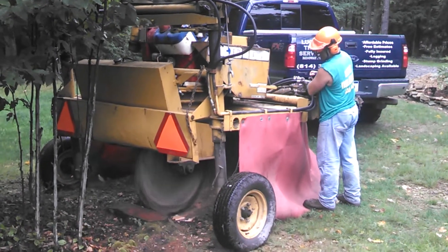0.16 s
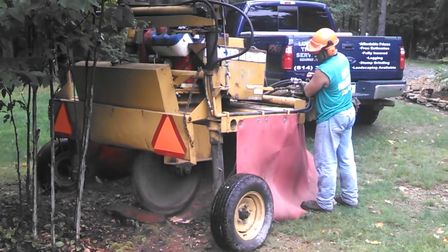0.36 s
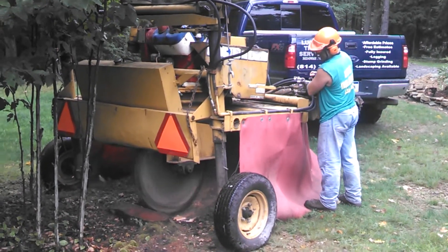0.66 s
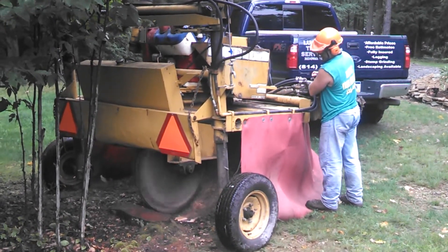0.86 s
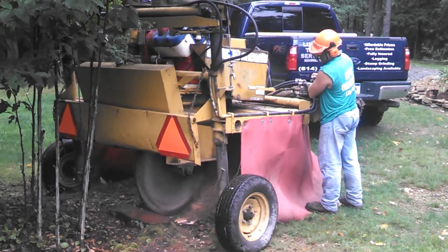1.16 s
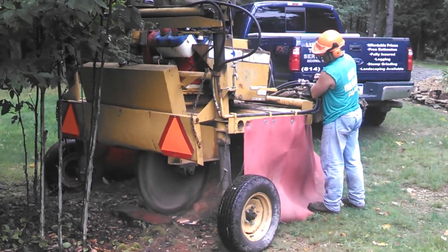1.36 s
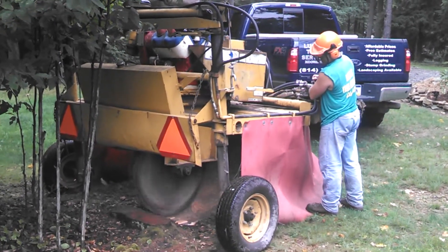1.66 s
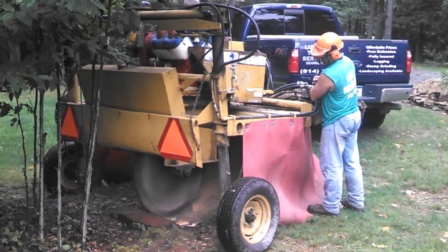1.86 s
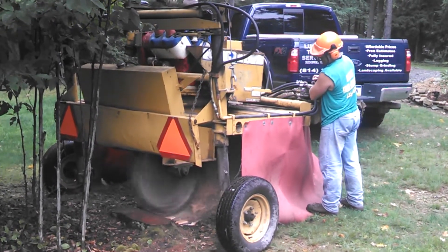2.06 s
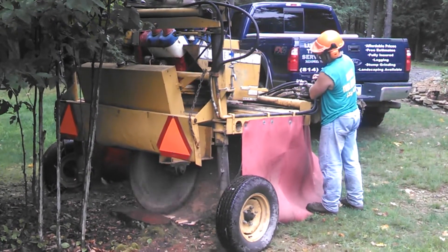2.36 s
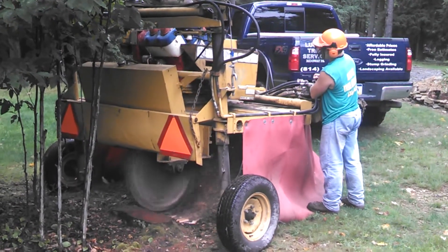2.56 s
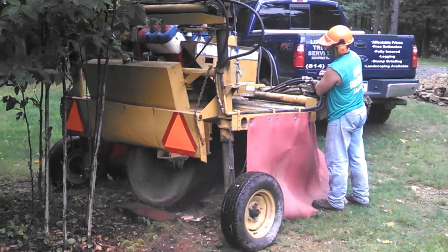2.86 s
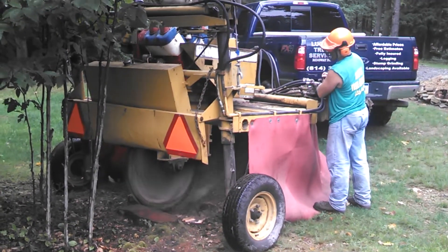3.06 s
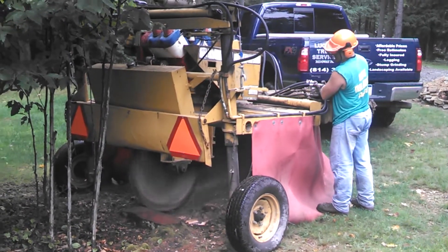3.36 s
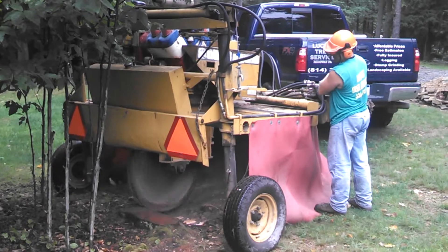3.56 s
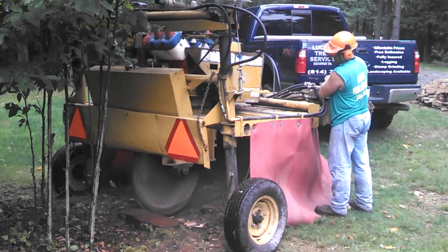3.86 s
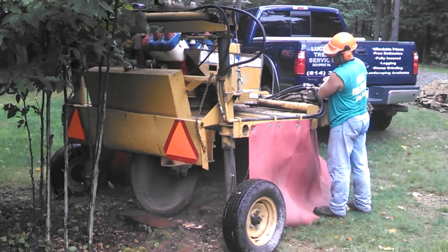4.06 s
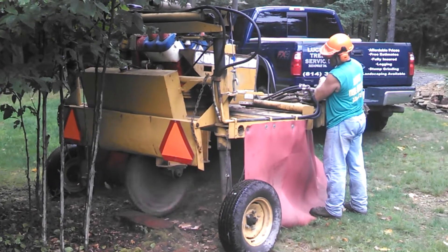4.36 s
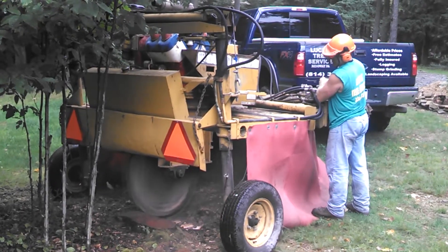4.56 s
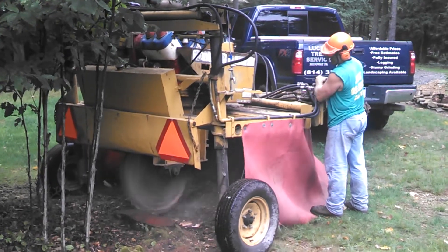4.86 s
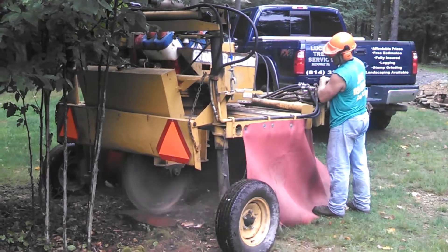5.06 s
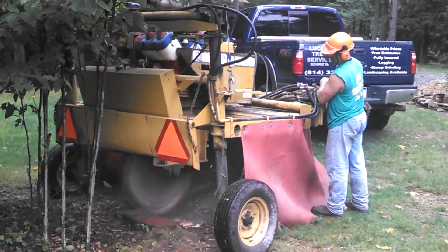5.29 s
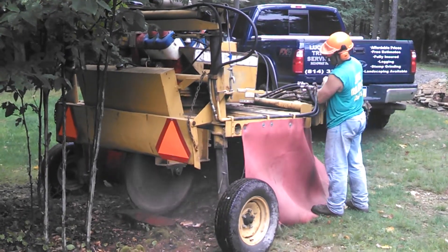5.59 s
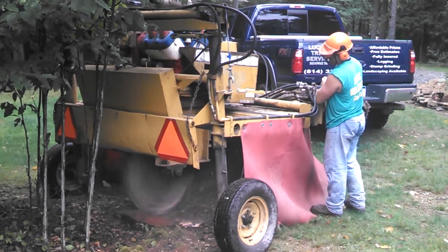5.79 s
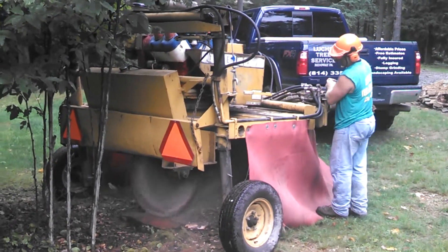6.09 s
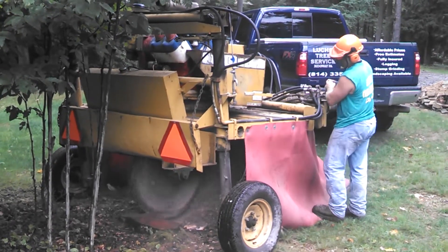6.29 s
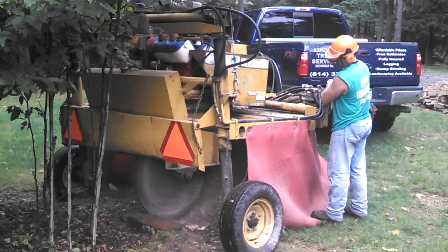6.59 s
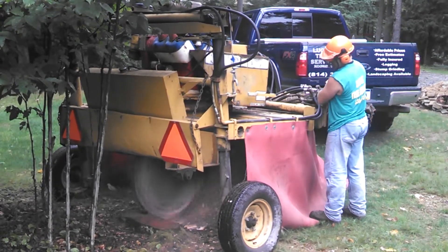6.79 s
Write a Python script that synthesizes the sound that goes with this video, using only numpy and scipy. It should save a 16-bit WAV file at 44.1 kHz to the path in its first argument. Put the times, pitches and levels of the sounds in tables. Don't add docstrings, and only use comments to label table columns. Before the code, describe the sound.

A petrol engine hums and rumbles a few metres away outdoors while a big cutter wheel chews a stump with rough, pulsing thuds and hissing chips. The steel disc rings throughout. The engine sags, then a cluster of hard clangs and a sharp stone crack come around three seconds; it recovers, then bogs down again. Wide stereo, with brief level dips after the loudest cracks.

```python
import sys
import numpy as np
from scipy import signal
from scipy.fft import rfft, irfft
from scipy.io import wavfile
from scipy.ndimage import uniform_filter1d

SR = 44100
rng = np.random.default_rng(int(sys.argv[2]) if len(sys.argv) > 2 else 0)


def voltage_ratio(decibels):
    exponent = np.asarray(decibels, float) / 20
    return 10 ** exponent


def materialize(psi):
    bounded = np.clip(np.atleast_2d(psi).T, -1, 1)
    quanta = np.round(bounded * 32767).astype(np.int16)
    wavfile.write(sys.argv[1], SR, quanta)


N = 305602
TIME_S = np.arange(N) / SR
FREE_HZ, STALLING_HZ = 98, 85.5
SWING_S = 4.4


def read(points, hz, column=1):
    table = np.array(points, float)
    return np.interp(np.log(hz + 1), np.log(table[:, 0] + 1), table[:, column])


def curves(rows):
    s, *columns = np.transpose(rows)
    return [np.interp(TIME_S, s, c) for c in columns]


def bumps(rows):
    return sum(db * np.exp(-((TIME_S - s) / width) ** 2) for s, width, db in rows)


def evened(x):
    return x / np.sqrt(np.mean(x ** 2) + 1e-20)


def coloured(x, points):
    gain = voltage_ratio(read(points, np.fft.rfftfreq(N, 1 / SR)))
    return evened(irfft(rfft(x) * gain, N))


def drift(per_s, channels=1):
    width = max(round(SR / per_s), 2)
    noise = rng.standard_normal((channels, N))
    return evened(uniform_filter1d(uniform_filter1d(noise, width), width))


def ringing(x, modes, wander_db=3.5):
    swells = voltage_ratio(wander_db * drift(6.7, channels=len(modes)))
    total = 0
    for swell, (hz, width_hz, db) in zip(swells, modes):
        radius, angle = np.exp(-np.pi * width_hz / SR), 2 * np.pi * hz / SR
        poles = [1, -2 * radius * np.cos(angle), radius * radius]
        mode = np.sqrt(1 - radius) * signal.lfilter([1, 0, -1], poles, x)
        total = total + voltage_ratio(db) * swell * mode
    return evened(total)


def knocks(per_s, spread_db):
    chance, sign, size = rng.random((3, 2, N))
    height = voltage_ratio(-spread_db * np.log(np.maximum(size, .01)))
    return (chance < per_s / SR) * np.sign(sign - .5) * height


def firing_hz():
    # start_s, firings_hz
    speed = [(0.0, 95.0), (0.42, 95.0), (0.84, 94.2), (1.26, 93.2), (1.68, 91.5), (1.89, 90.4),
             (2.42, 89.7), (2.73, 91.2), (2.94, 93.3), (3.36, 94.4), (3.78, 97.1), (4.2, 97.8),
             (4.62, 97.2), (5.04, 93.4), (5.46, 91.4), (5.88, 88.3), (6.3, 84.7), (6.93, 85.6)]
    return curves(speed)[0]


def wheel_turns(hz):
    firings_per_turn, heavy_tooth_s, swing_turns = 9.55, 6.098, .13
    cycles = np.cumsum(hz) / SR
    since_heavy = cycles - cycles[round(heavy_tooth_s * SR)]
    return since_heavy / firings_per_turn + swing_turns * (np.arange(N) < SWING_S * SR)


def tooth_bite(teeth):
    # pitch_hz, level_db
    wood = [(350, -20.5), (600, -5.5), (800, -3), (1000, -6), (1500, -6), (1950, -6.5), (2200, -3.5),
            (2700, -9), (3600, -12), (4300, -25)]
    # pitch_hz, width_hz, level_db
    disc = [(1027, 11, 2), (1228, 46, 3.5), (1527, 31, -4), (1600, 5.3, 0), (1854, 41, 5), (1975, 69, -3.5),
            (2475, 200, 8), (3130, 390, -15)]
    return 1.137 * coloured(teeth, wood) + 0.34 * ringing(teeth, disc)


def disc_hum(strikes, load):
    # pitch_hz, width_hz, level_db
    free_modes = [(708.5, 26, 2.5), (767, 27, 6.5), (790, 69, -0.5)]
    # pitch_hz, width_hz, level_db
    loaded_modes = [(805, 28, -.5), (845, 30, -3), (878, 28, -1.5), (925, 35, -6)]
    free = np.sqrt(1 - .85 * load ** 2) * ringing(strikes, free_modes, wander_db=1.5)
    return free + 1.3 * load ** 1.5 * ringing(strikes, loaded_modes, wander_db=.8)


def chip_spray(heavy, groups, coarseness_db):
    # pitch_hz, level_db
    chip_colour = [(1500, -3), (3000, 4.5), (4200, 6.5), (6000, 3.3), (9500, 6), (11000, -17), (13000, 0),
                   (14600, -2), (15500, 0)]
    # pitch_hz, level_db
    dust_colour = [(9000, -15), (11000, -6), (13000, -6), (15500, -0.5)]
    fling = np.where(np.arange(N) < SWING_S * SR, .9, 1.6)
    chips = rng.standard_normal((2, N)) + 0.35 * evened(knocks(920, 2.3))
    unsteady = voltage_ratio(0.76 * drift(24) + 1.2 * drift(7.4))
    spray = coloured(chips * unsteady * (1 + fling * heavy + 0.5 * groups), chip_colour)
    dust = coloured(rng.standard_normal((2, N)) * (1 + fling * heavy), dust_colour)
    dust = dust * voltage_ratio(0.93 * drift(2.6))
    dust_loss = 3.2
    return spray + dust * voltage_ratio(-9.0 - dust_loss * (coarseness_db - 6.0))


def cutter(hz, load, spray_db, bite_db, hum_db):
    turns = wheel_turns(hz)
    heavy = np.sqrt(load) * uniform_filter1d(np.exp(-(turns % 1) / .12), size=150)
    groups = load * uniform_filter1d(np.exp(-((4 * turns + .25) % 1) / .35), size=200)
    after = load * np.cos(2 * np.pi * (turns - .45))
    uneven = voltage_ratio(0.96 * drift(33))
    teeth = knocks(3000, 1.27) * uneven * (1 + .5 * heavy + 0.16 * groups)
    strikes = knocks(2400, 1.9) * (1 + 0.22 * after) * (1 + 1.8 * groups)
    bite = voltage_ratio(bite_db - 1.5) * tooth_bite(teeth)
    hum = voltage_ratio(hum_db - 4.5) * disc_hum(strikes, load)
    return bite + hum + voltage_ratio(spray_db + 2.0) * chip_spray(heavy, groups, bite_db - spray_db)


def hits(rows, t60, lift_db, rise_s):
    out, t = np.zeros((2, N + 8000)), np.arange(8000) / SR
    for (s, db, hz), phase in zip(rows, rng.random((len(rows), 2, 1))):
        envelope = voltage_ratio(db + lift_db - 60 * t / t60) * (1 - np.exp(-t / rise_s))
        ring = envelope * np.sin(2 * np.pi * (hz * t + phase)) * [[1], [.6]]
        out[:, round(s * SR):][:, :8000] += ring
    return out[:, :N]


def catches():
    # start_s, level_db, pitch_hz
    snags = [(0.204, 1, 791), (0.266, -10, 840), (0.417, 0, 808), (0.635, 2, 840), (0.843, 6, 780),
             (1.202, -2, 920), (1.285, 3, 780), (1.33, -2, 833), (1.823, 4, 824), (2.32, -8, 890),
             (2.417, 0, 690), (2.922, 7, 1600), (3.002, -4, 1470), (3.027, 4, 820), (3.101, -8, 1460),
             (3.154, -4, 790), (3.206, 3, 820), (3.918, -2, 760), (4.339, -10, 720), (4.818, 3, 753),
             (5.011, 1, 780), (5.302, 0, 755), (5.615, 0, 807), (6.013, 3, 804), (6.043, 9, 813),
             (6.152, -2, 860), (6.232, 4, 760), (6.347, -7, 815), (6.516, 3, 828), (6.584, 4, 800)]
    return hits(snags, t60=0.05, lift_db=-13.5, rise_s=0.0048)


def pings():
    # start_s, level_db
    rim_strikes = [(.465, -14), (2.671, -2), (2.926, -1), (3.156, -5), (3.256, -8), (3.331, -4), (3.433, 1),
                   (3.536, -2), (4.83, -1.5), (5.007, -8), (5.754, -9), (6.314, -10)]
    rows = [(s, db, 2494) for s, db in rim_strikes]
    return hits(rows, t60=0.024, lift_db=3.0, rise_s=0.0052)


def jams():
    # start_s, length_s, low_clang_db, high_clang_db
    clangs = [(2.912, 0.045, -29, -21.5), (2.966, 0.027, -31, -31), (2.994, .025, -36, -25),
              (3.02, 0.055, -18, -24), (3.096, 0.06, -26, -18), (3.138, 0.031, -17, -25),
              (3.197, 0.037, -24, -32), (3.25, 0.03, -21, -27), (3.426, 0.052, -26, -25.5),
              (1.9, .2, -29, -45), (4.82, .05, -36, -29), (5.17, .27, -27, -45), (5.55, .12, -45, -31),
              (5.9, .1, -27, -45), (6.28, .26, -26.5, -45)]
    # pitch_hz, width_hz, level_db
    low_modes = [(801, 48, 8), (890, 40, 3), (970, 37, -2.5)]
    # pitch_hz, width_hz, level_db
    high_modes = [(1240, 54, -9), (1512, 33, -1.5), (1600, 39, 0), (2023, 65, -1.5)]
    low, high = np.zeros((2, N))
    for s, length, low_db, high_db in clangs:
        shape = signal.windows.tukey(round(length * SR), .6)
        low[round(s * SR):][:len(shape)] += voltage_ratio(low_db) * shape
        high[round(s * SR):][:len(shape)] += voltage_ratio(high_db) * shape
    low_clang = low * ringing(knocks(1500, 0.87), low_modes, wander_db=0.0)
    return low_clang + high * ringing(knocks(1500, 1.5), high_modes, wander_db=0.0)


def grit():
    # start_s, level_db, pitch_hz
    stones = [
        (0.6923, -15, 9340),
        (3.2648, -13.5, 9100),
        (3.268, -17, 9210),
        (4.6768, -22, 9780),
        (4.7272, -24, 6560),
        (5.4216, -21.5, 6170),
        (5.458, -23, 9620),
        (5.8406, -20.5, 6800),
        (6.1394, -22, 9270),
    ]
    out, t = np.zeros((2, N + 1000)), np.arange(1000) / SR
    for (s, db, hz), noise in zip(stones, rng.standard_normal((len(stones), 2, 1000))):
        band = signal.lfilter(*signal.butter(1, [hz * 0.87, hz * 1.08], "band", fs=SR), noise)
        envelope = voltage_ratio(db + 1.0 - 60 * t / .035) * (1 - np.exp(-t / 0.00062))
        out[:, round(s * SR):][:, :1000] += envelope * evened(band)
    return out[:, :N]


def exhaust_levels(load, engine_level_db):
    loads = [0, .3, .55, .75, 1]
    loaded_db = [
        (-45, -46.5, -41.5, -41, -37.5),
        (-27.5, -32, -40, -33, -39.5),
        (-30, -33.5, -34.5, -44, -59),
    ]
    lifts_db = [13.5, 9.5, 4.5]
    lags_s = [.45, .02, .05]
    shares = [0.16, 1, 1]
    swung_db = [-1, -0.7, 4.5]
    shaded_db = [-10, -.3, -.3]
    swung = np.clip((TIME_S - 3.8) / .3 + .5, 0, 1)
    levels = []
    for k, row in enumerate(loaded_db):
        late_load = np.interp(TIME_S - lags_s[k], TIME_S, load)
        level_db = np.interp(late_load, loads, row) + lifts_db[k] + shares[k] * engine_level_db
        levels.append(level_db + swung_db[k] * swung + bumps([(3.88, .15, shaded_db[k])]))
    return levels


def engine(hz, load, engine_level_db):
    # pitch_hz, level_db
    casing = [(25, -38), (45, -21), (70, -14.5), (120, -11.5), (160, 2), (215, -6.5), (320, -0.5),
              (400, -11.5), (560, -13), (1200, -35)]
    cycles = np.cumsum(hz) / SR
    order_db = exhaust_levels(load, engine_level_db)
    strain = .25 + load
    wobble = .17 * strain * drift(12, channels=3)
    flutter_db = 1.45 * strain * drift(9.3, channels=3)
    orders = 0
    for k in range(3):
        tone = np.cos(2 * np.pi * (k + 1) * cycles + wobble[k] * (k + 1))
        orders = orders + np.sqrt(2) * voltage_ratio(order_db[k] + flutter_db[k]) * tone
    puffs = (1 + 0.2 * np.cos(2 * np.pi * cycles)) * rng.standard_normal((2, N))
    scatter = np.array([[1], [.3]])
    return orders * scatter + voltage_ratio(-20 + engine_level_db) * coloured(puffs, casing)


def ports(direct, scattered):
    # pitch_hz, likeness (0-1), level_db, lag_rad
    pair = [(45, .96, -2.3, 0), (100, .998, -3, 0), (290, .997, -1.8, 0), (400, .87, 2.6, .16),
            (480, .68, -4, .9), (600, .75, -8.5, .03), (750, .93, -3.5, .05), (1050, .7, -4, .2),
            (1700, .72, -2.5, 1.4), (2400, .8, -1.8, 1.5), (4000, .5, -2, 2.8), (6100, .53, -5, 4.7),
            (9000, .42, -6.5, 10.85), (14500, .27, 2, 22.6)]
    hz = np.fft.rfftfreq(N, 1 / SR)
    same = np.clip(read(pair, hz), 0, 1)
    lag = np.interp(hz, *np.transpose(pair)[[0, 3]])
    second = same * np.exp(-1j * lag) * rfft(direct) + np.sqrt(1 - same ** 2) * rfft(scattered)
    return np.array([direct, irfft(second * voltage_ratio(read(pair, hz, column=2)), N)])


def scene():
    # start_s, level_db
    engine_level = [(0, -1.5), (.7, 0), (.95, 1), (1.35, -1), (1.9, 1), (2.3, -1), (2.87, 0.5), (3.0, -5.5),
                    (3.3, -2.5), (3.75, -3), (4.3, -0.5), (5.1, -0.5), (5.45, 0.5), (5.9, -1), (6.3, 1),
                    (6.93, 0)]
    # start_s, level_db
    depth = [(0, 0), (.6, -0.5), (.875, 1), (1.375, -1.5), (1.7, 0.5), (2.25, -1), (2.6, 0.5), (2.875, 0.5),
             (3.0, 3.5), (3.25, 3.5), (3.5, -1), (4.0, -1), (4.5, -1), (4.85, 2), (5.2, -1.5), (5.7, -1.5),
             (6.05, -2), (6.93, -1.5)]
    # centre_s, half_width_s, level_db
    gusts = [
        (.45, 0.029, 1),
        (1.57, 0.026, 2),
        (2.12, 0.021, 1),
        (3.54, 0.049, 2.5),
        (4.33, 0.13, 2),
        (5.05, .15, -2.2),
        (6.9, 0.019, -3.5),
    ]
    # centre_s, half_width_s, level_db
    singing = [(.15, 0.2, 1.5), (.95, .1, 2), (1.25, 0.096, 3), (3.38, .08, 3.5), (3.88, 0.06, 1),
               (4.25, .12, 3), (5.3, .15, 3), (5.72, 0.091, 1), (6.4, 0.21, 3.5), (6.75, .1, 1.5)]
    (engine_level_db,), (depth_db,) = curves(engine_level), curves(depth)
    hz = firing_hz()
    load = np.clip((FREE_HZ - hz) / (FREE_HZ - STALLING_HZ), 0, 1)
    bite_db = -25.5 + depth_db + 0.5 * load
    spray_db = -31.5 + 0.61 * depth_db + .5 * load + bumps(gusts)
    hum_db = -24.5 - 5.5 * load - 0.2 * depth_db + bumps(singing)
    wheel = cutter(hz, load, spray_db, bite_db, hum_db)
    motor = engine(hz, load, engine_level_db)
    return ports(*(wheel + catches() + pings() + jams() + grit() + motor))


def roll_off(x):
    return signal.sosfilt(signal.butter(12, 16860, fs=SR, output="sos"), x)


def record(dry):
    # start_s, drop_db, recovery_db_per_s
    ducks = [
        (.696, 5, 8.5),
        (3.267, 7.5, 6),
        (5.46, 2, 5),
        (6.885, 2.5, 5.5),
    ]
    late = np.pad(dry[::-1], ((0, 0), (16, 0)))[:, :N]
    duck_db = sum((TIME_S > s) * np.maximum(db - rate * (TIME_S - s), 0) for s, db, rate in ducks)
    wide = (dry - .88 * late) * voltage_ratio(-uniform_filter1d(duck_db, size=150))
    band_limit = signal.firwin(1023, 15500, window=("kaiser", 11), fs=SR)
    return roll_off(signal.oaconvolve(wide, band_limit[None], "same"))


dry = scene()
out = record(dry)
materialize(out)
```